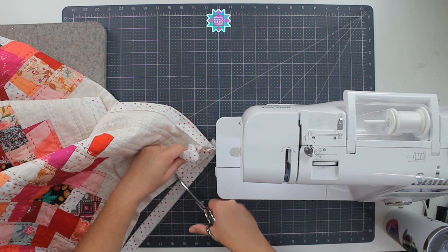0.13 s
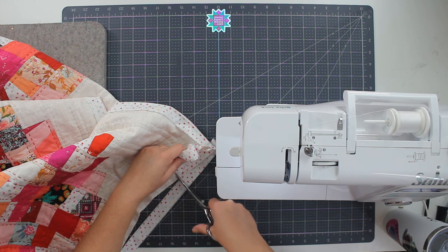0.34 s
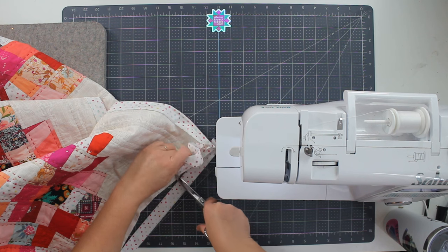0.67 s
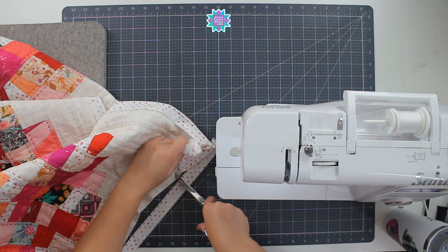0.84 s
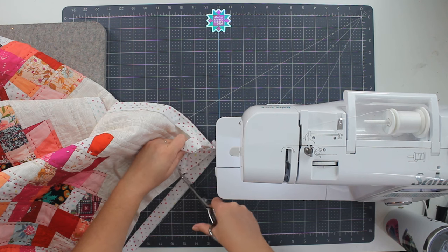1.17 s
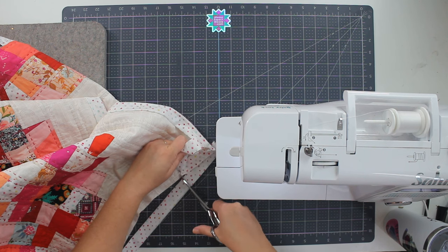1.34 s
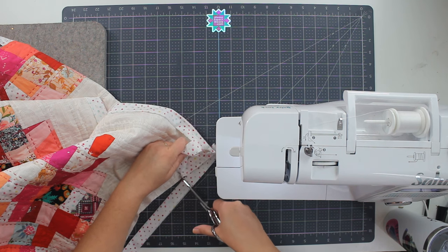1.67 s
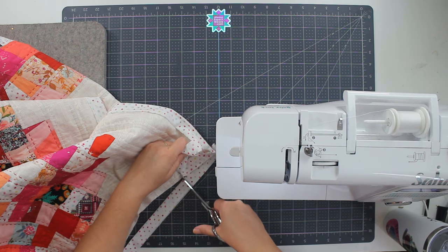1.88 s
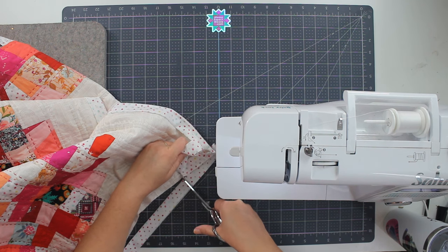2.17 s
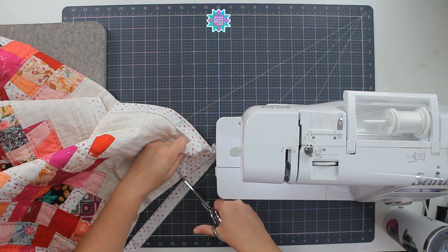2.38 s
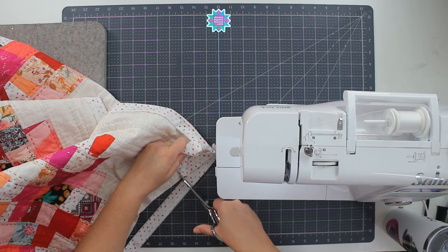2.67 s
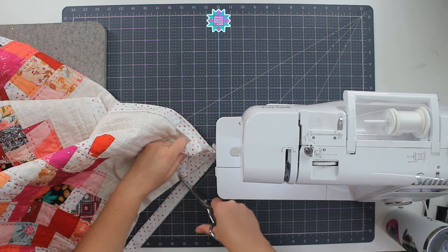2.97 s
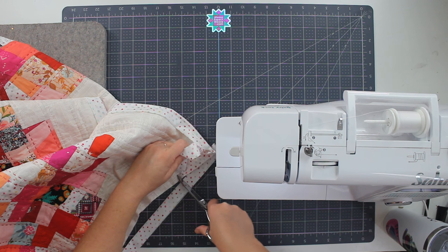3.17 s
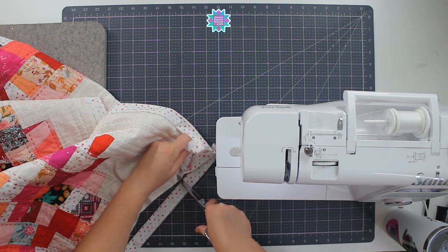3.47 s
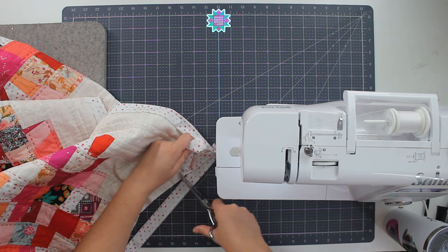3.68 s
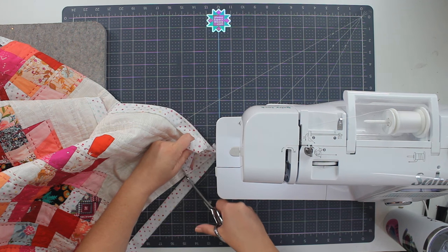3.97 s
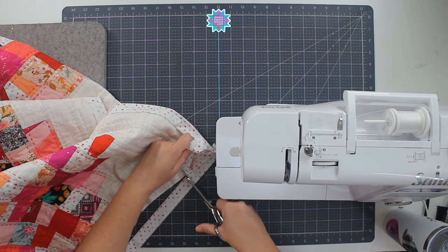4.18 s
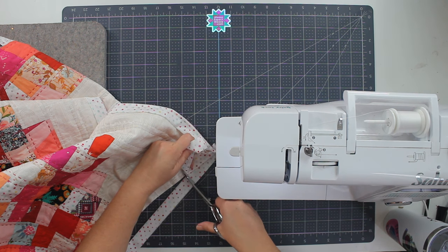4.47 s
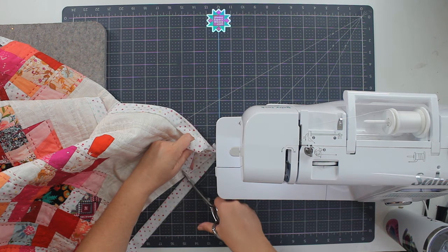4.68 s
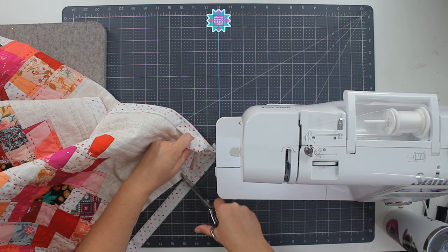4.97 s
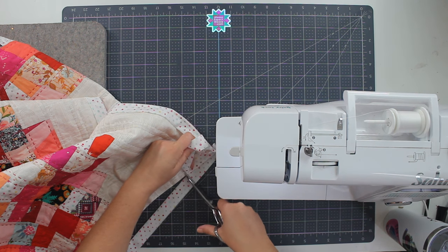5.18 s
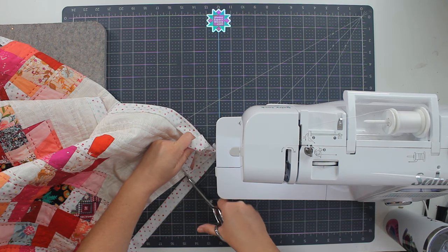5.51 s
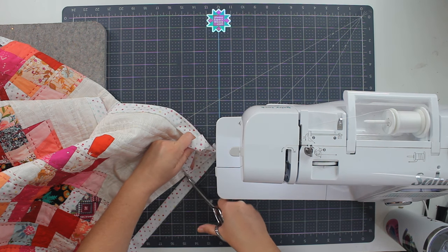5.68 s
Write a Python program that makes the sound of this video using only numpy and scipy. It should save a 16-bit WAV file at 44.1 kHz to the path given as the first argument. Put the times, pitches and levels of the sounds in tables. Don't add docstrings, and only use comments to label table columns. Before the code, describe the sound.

In a small, fairly dry room, large scissors work at a quilt on a hollow table. An early crisp snip is followed by a low thump and soft cloth rustling. After a light metallic tap and a lull comes the loudest snip, more small knocks, then one gentle snip. Single close microphone, identical in both channels, steady faint hiss.

```python
import sys
import numpy as np
from scipy import signal
from scipy.fft import rfft, irfft
from scipy.io import wavfile
from scipy.ndimage import map_coordinates

SR = 44100
rng = np.random.default_rng(int(sys.argv[2]) if len(sys.argv) > 2 else 0)


def gain_from_db(level_db):
    decades = np.asarray(level_db, float) / 20
    return 10 ** decades


def wrap_up_sound(samples):
    columns = np.atleast_2d(samples).T
    tamed = np.clip(columns, -1, 1)
    steps = np.round(tamed * 32767).astype(np.int16)
    wavfile.write(sys.argv[1], SR, steps)


N = 257720

# pitch_hz, t60_s
ROOM_DECAY = [(150, 0.19), (500, 0.18), (4000, 0.096), (12000, 0.12), (16000, 0.086)]
# pitch_hz, density_db (per Hz)
HISS_COLOUR = [(12, -38), (20, -3.5), (53, -10.0), (76, 0.0), (122, -2.0), (232, -2), (282, -2.0),
               (728, -6.5), (814, -6.5), (935, -6.5), (1240, -8), (6400, -10.5), (14000, -15.5),
               (15600, -21)][:-1]

# peak_s, half_length_s, level_db
QUILT_DRAGS = [(0.108, 0.051, -63), (0.486, 0.051, -60), (0.6, 0.052, -60.5), (0.706, 0.045, -58.5),
               (0.786, 0.028, -57), (0.862, 0.022, -60), (0.908, 0.041, -57.5), (1.018, 0.03, -63),
               (1.163, 0.058, -63.5), (1.315, .06, -62.5), (1.406, 0.04, -59), (1.492, 0.04, -64),
               (2.383, 0.013, -64), (2.465, 0.042, -67), (3.133, 0.14, -65.5), (3.22, 0.055, -66),
               (3.315, 0.04, -59.5), (3.417, 0.052, -63.5), (3.516, 0.053, -66.5), (3.612, 0.031, -61.5),
               (4.13, .03, -77), (4.418, 0.026, -68), (5.176, 0.036, -69)]
# pitch_hz, density_db (per Hz)
SWISH_COLOUR = [(150, 5), (400, -1.5), (1000, 0), (2500, -2), (5000, -5.5), (9000, -15)]
# pitch_hz, density_db (per Hz)
FIBRE_COLOUR = [(3000, -20), (6000, -6), (11000, 5), (15500, 2.5)]

# start_s, level_db, boom_db (higher nearer the middle), hardness_db
TABLE_KNOCKS = [(0.233, -54, -10, -26), (0.326, -40.5, -19, -12), (0.35, -46.5, -32, -17),
                (0.477, -12.5, -26, -23.5), (0.548, -48, -29, 2), (0.594, -43, -17, -7.5),
                (0.67, -29, -30, -12.5), (0.706, -30, -23, -8.5), (0.771, -35.5, -20, -8.5),
                (0.899, -60, -28, 13), (1.013, -49, -36, 1), (2.369, -55.5, -28, 2.5),
                (2.468, -43.5, -26, -15), (2.488, -53, -20, -14), (2.786, -51, -22.5, -18),
                (2.838, -33, -26.5, -6), (3.043, -37.5, -10.5, -53), (3.185, -47.5, -28, -1),
                (3.245, -44, -25, 1.1), (3.296, -42, -22, -21), (3.3045, -30.5, -31, -13),
                (3.351, -45, -20, -3), (3.598, -53, -19, 2), (4.517, -48, -23, -26)]
# pitch_hz, level_db, t60_s
TABLE_MODES = [(122.3, 14, 0.18), (196.4, 0, 0.1), (236.8, 0, 0.087), (259, -7, 0.043), (376, 11.5, 0.048),
               (514.5, 10.5, 0.087), (526.2, 1, 0.12), (701, 3, 0.054), (819, 4.5, 0.051),
               (900, -10, 0.037), (1200, 6.5, 0.014)]

# start_s, level_db, ring_db, table_echo_db, room_db
BED_TAPS = [
    (1.644, -32, -6, -14, -2.5),
]
# pitch_hz, level_db, t60_s
BED_MODES = [(650, -3, 0.18), (1330, -9, 0.056), (2000, 6.5, 0.029), (2830, -1, 0.086), (4110, 4.5, 0.02),
             (5760, -5, 0.048), (7500, 5.5, 0.02)]
# pitch_hz, density_db (per Hz)
BED_CONTACT_COLOUR = [(290, -30), (500, -13), (1120, -2), (2010, -10), (2570, -3), (2940, -4), (4110, -15),
                      (4620, -9.5), (7600, -9), (8180, -20), (14300, -16), (16500, -20)]

# peak_s, level_db, length_s, squeak_hz
SHEARS = [(0.14, -61, 0.0054, 12000), (0.3297, -41, .002, 11900), (0.334, -41, .003, 12500),
          (0.595, -57.5, 0.0034, 11400), (1.012, -59, .003, 12800), (2.789, -54, .003, 12400),
          (2.838, -35, 0.0035, 11960), (3.307, -52.5, 0.0034, 4500), (3.603, -56.5, 0.0036, 11600),
          (4.845, -59.5, 0.0063, 11600)]
# peak_s, level_db, length_s, squeak_hz
STEEL_RUBS = [(.328, -43, 0.0044, 11800), (1.012, -49.5, 0.0036, 1200), (1.027, -59, .005, 11400),
              (2.799, -57, .003, 7350), (2.801, -54.5, .003, 12100), (2.83, -52, 0.0046, 12000),
              (2.845, -50, .003, 11800), (3.495, -65.5, 0.057, 4970), (4.41, -67.5, 0.038, 1000),
              (4.487, -53, .005, 12300), (4.488, -63.5, 0.01, 1080), (4.493, -45, 0.0042, 11700),
              (4.5, -49, 0.0033, 7200), (4.501, -42, 0.0037, 12400), (4.505, -48, 0.0065, 9900),
              (4.5, -60, 0.0097, 3860), (5.44, -68.5, .03, 920)]
# peak_s, level_db, length_s
THREAD_TUGS = [(.4725, -54, 0.0031), (0.511, -66, .003), (0.71, -63, 0.0067), (0.77, -71, 0.01),
               (4.429, -69, .004), (4.672, -65.5, .008)]
# pitch_hz, density_db (per Hz)
RASP_COLOUR = [(1200, 1), (2500, 1), (4000, 6), (8000, 1), (10500, -16), (13000, 3.5), (15400, 5.5),
               (16000, -9), (16800, -30)]

# start_s, level_db, ring_db, table_echo_db, room_db
SNAPS = [
    (0.3485, -13, -14.5, -12, -9),
    (2.8499, -9, -16, -26, -8),
    (4.572, -26.5, -14, -15, -8),
]
# pitch_hz, level_db, t60_s
BLADE_MODES = [
    [(2605, 3, 0.034), (3430, 1, 0.032), (4500, -9, 0.087), (5445, -2, .05), (6200, -7, .08),
     (10210, -3, 0.059), (12000, 17.5, 0.023), (12800, 15, 0.014), (13230, 16, .02)],
    [(2683, 2.5, 0.029), (3370, -2, 0.025), (4544, -7.5, 0.12), (5500, -10, 0.14), (6280, -11, 0.08),
     (12400, 14, 0.014), (13170, 20, 0.018), (13500, 10.5, .022)],
    [(2310, 5, 0.026), (2600, 7, 0.014), (4120, 1.5, 0.071), (5500, -1, 0.031), (8750, 0, 0.029),
     (13000, 9, 0.041), (13100, 6, 0.014)],
]
# pitch_hz, density_db (per Hz)
SNAP_COLOURS = [
    [(590, -64), (1000, -19.5), (2070, -20), (2620, -10), (3080, -24), (3430, -14), (4650, -6), (4990, -26),
     (6310, -7), (8260, -8.5), (8760, -13), (12700, -1.5), (15600, -15), (16500, -23)],
    [(590, -57), (1000, -24), (2120, -24), (2620, -2), (3080, -25), (3390, -19), (3900, -15), (4490, -6),
     (4990, -20), (6230, -10), (8160, -17), (13000, -3.5), (15700, -6), (16500, -17)],
    [(880, -60), (1500, -33), (1990, -34), (2260, -6), (3660, -15), (4050, 8), (4800, -15), (7700, -17),
     (8600, -13), (9220, -23), (13000, -1), (16500, -29)],
]


def unit(x):
    return x / np.sqrt(np.mean(x ** 2) + 1e-20)


def along(points, hz):
    point_hz, value = np.transpose(points)
    return np.interp(np.log(hz + 1), np.log(point_hz + 1), value)


def noise(count, spectrum):
    hz = np.fft.rfftfreq(count, 1 / SR)
    low_edge = [(spectrum[0][0] / 2, -120)]
    gain = gain_from_db(along(low_edge + list(spectrum), hz))
    return unit(irfft(rfft(rng.standard_normal(count)) * gain, count))


def causal(x, spectrum):
    hz = np.fft.rfftfreq(len(x), 1 / SR)
    cepstrum = irfft(np.log(gain_from_db(along(spectrum, hz)) + 1e-6), len(x))
    fold = 2.0 * (np.arange(len(x)) < len(x) // 2)
    fold[0] = 1
    gain = np.exp(rfft(cepstrum * fold))
    return irfft(rfft(x) * gain / np.sqrt(np.mean(abs(gain) ** 2)), len(x))


def add(track, start_s, sound):
    part = track[round(start_s * SR):][:len(sound)]
    part += sound[:len(part)]


def ringing(modes, t, attack_s, scatter_db):
    hz, db, t60 = np.transpose(modes)[:, :, None]
    db = db + scatter_db * rng.standard_normal(hz.shape)
    sines = gain_from_db(db - 60 * t / t60) * np.sin(2 * np.pi * hz * t)
    return sines.sum(0) * (1 - np.exp(-t / attack_s))


def reverberation(x):
    hz, t, cells = signal.stft(rng.standard_normal(len(x)), SR, nperseg=128)
    decay = gain_from_db(-60 * t / along(ROOM_DECAY, hz)[:, None])
    tail = signal.istft(cells * decay, SR, nperseg=128)[1]
    delayed = np.pad(x, (round(0.0022 * SR), 0))
    return signal.fftconvolve(delayed, tail / np.linalg.norm(tail))[:len(x)]


def background_hiss():
    return gain_from_db(-60.5) * noise(N, HISS_COLOUR)


def quilt_rustle():
    peak_s, half_s, db = np.transpose(QUILT_DRAGS)[:, :, None]
    coarse_s = np.arange(0, N, 64) / SR
    swells = (gain_from_db(db) * np.exp(-((coarse_s - peak_s) / half_s) ** 2)).sum(0)
    clump_samples = 300
    wander = rng.standard_normal(N // clump_samples + 4)
    clumps = gain_from_db(1.9 * map_coordinates(wander, [np.arange(N) / clump_samples]))
    level = clumps * np.interp(np.arange(N) / SR, coarse_s, swells)
    return level * (noise(N, SWISH_COLOUR) + gain_from_db(-5.5) * noise(N, FIBRE_COLOUR))


def table_knocks():
    track, t = np.zeros(N), np.arange(SR // 3) / SR
    for start_s, db, boom_db, hardness_db in TABLE_KNOCKS:
        middle_db = -11.5 + 0.31 * hardness_db
        # (pitch_hz, level_db)
        drive = [(125, boom_db + 3.5), (188, -3), (240, 0.0042), (290, 0),
                 (380, middle_db), (560, middle_db), (680, hardness_db)]
        modes = [(hz, level + along(drive, hz), t60) for hz, level, t60 in TABLE_MODES]
        dry = ringing(modes, t, attack_s=0.0013, scatter_db=2.5)
        add(track, start_s, -gain_from_db(db - 9.5) * (dry + gain_from_db(-7) * reverberation(dry)))
    highpass = signal.butter(N=4, Wn=92, btype="high", fs=SR, output="sos")
    return signal.sosfilt(highpass, track)


def contact_burst(t, contact_s):
    u = t / contact_s
    return u ** 2 * np.exp(2 - 2 * u) * rng.standard_normal(len(t))


def impacts(events, colours, bodies, contact_s):
    track, t = np.zeros(N), np.arange(SR // 4) / SR
    since_echo = np.clip(t - 0.0043, 0, None)
    for event, colour, modes in zip(events, colours, bodies):
        start_s, db, ring_db, echo_db, room_db = event
        echo = contact_burst(since_echo, 1.48 * contact_s)
        dry = causal(contact_burst(t, contact_s) + gain_from_db(echo_db) * echo, colour)
        dry = dry + gain_from_db(ring_db) * ringing(modes, t, attack_s=0.00042, scatter_db=1.0)
        add(track, start_s, gain_from_db(db - 9) * (dry + gain_from_db(room_db) * reverberation(dry)))
    return track


def machine_bed_tap():
    return impacts(BED_TAPS, [BED_CONTACT_COLOUR], [BED_MODES], contact_s=0.0016)


def blade_scrapes():
    track, t = np.zeros(N), np.arange(-SR // 20, SR // 10) / SR
    hz = np.fft.rfftfreq(len(t), 1 / SR)
    strokes = [(*row, -3) for row in SHEARS]
    strokes += [(*row, -13.5) for row in STEEL_RUBS]
    strokes += [(*row, 12000, 8.5) for row in THREAD_TUGS]
    for peak_s, db, length_s, squeak_hz, rasp_db in strokes:
        side_s = length_s * np.where(t < 0, 0.6, 1)
        stroke = np.exp(-(t / side_s) ** 2)
        grit = stroke * gain_from_db(8.5 * rng.standard_normal(len(t))) * rng.standard_normal(len(t))
        damping = 1j * hz * 300
        resonance = damping / (squeak_hz ** 2 - hz ** 2 + damping)
        squeak = gain_from_db(9.0) * irfft(rfft(grit) * resonance, len(t))
        dry = squeak + gain_from_db(rasp_db) * stroke * noise(len(t), RASP_COLOUR)
        add(track, peak_s + t[0], gain_from_db(db) * (dry + gain_from_db(-7.0) * reverberation(dry)))
    return track


def scissor_snaps():
    return impacts(SNAPS, SNAP_COLOURS, BLADE_MODES, contact_s=0.0013)


def scene():
    impacts_on_steel = scissor_snaps() + machine_bed_tap()
    mono = impacts_on_steel + blade_scrapes() + table_knocks() + quilt_rustle() + background_hiss()
    return np.array([mono, mono])


def roll_off(x):
    return signal.sosfilt(signal.butter(12, 16810, fs=SR, output="sos"), x)


def record(dry):
    over_hz = np.clip(np.fft.rfftfreq(N, 1 / SR) - 15900, 0, None)
    response = gain_from_db(-22 * (over_hz > 0) - 0.011 * over_hz)
    mix = irfft(rfft(dry) * response, N)
    return roll_off(mix)


dry = scene()
out = record(dry)
wrap_up_sound(out)
```